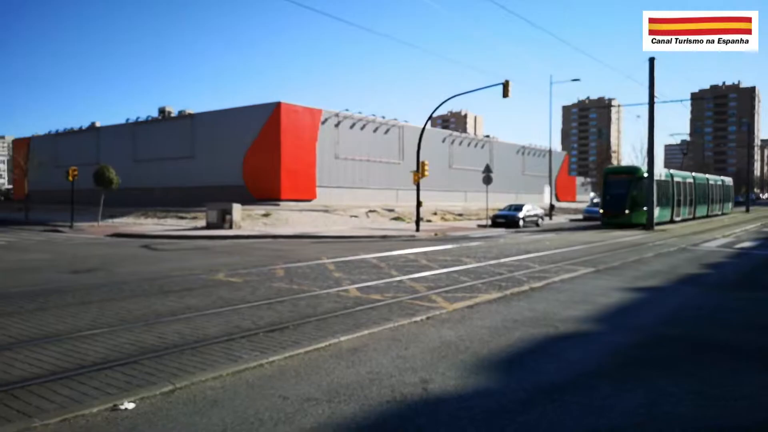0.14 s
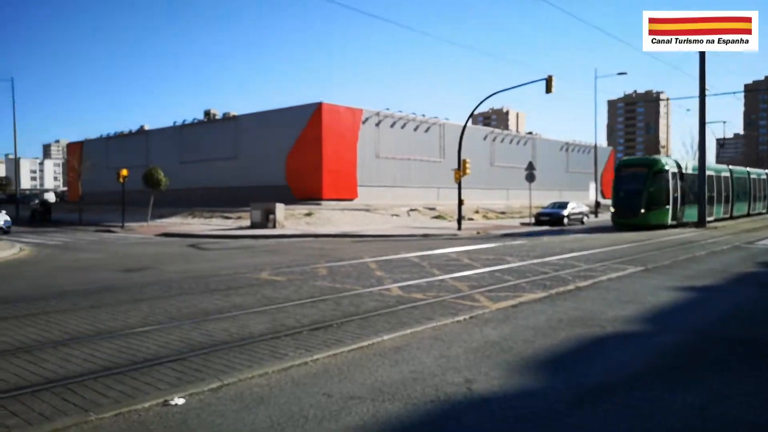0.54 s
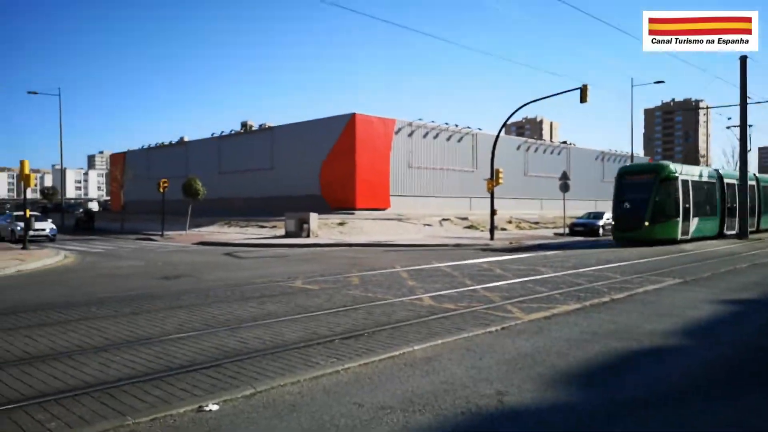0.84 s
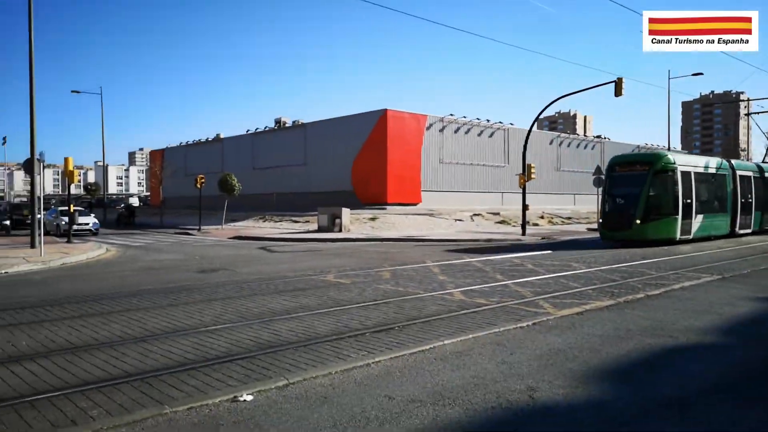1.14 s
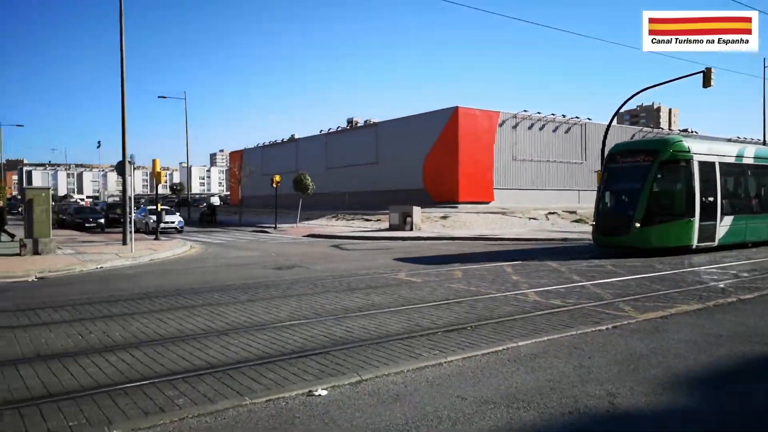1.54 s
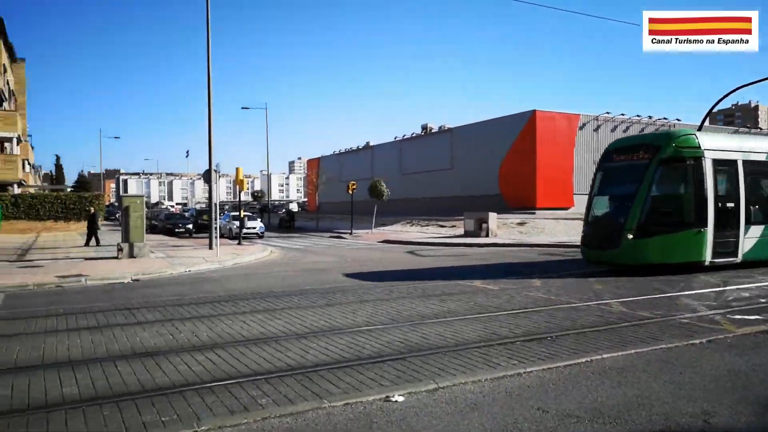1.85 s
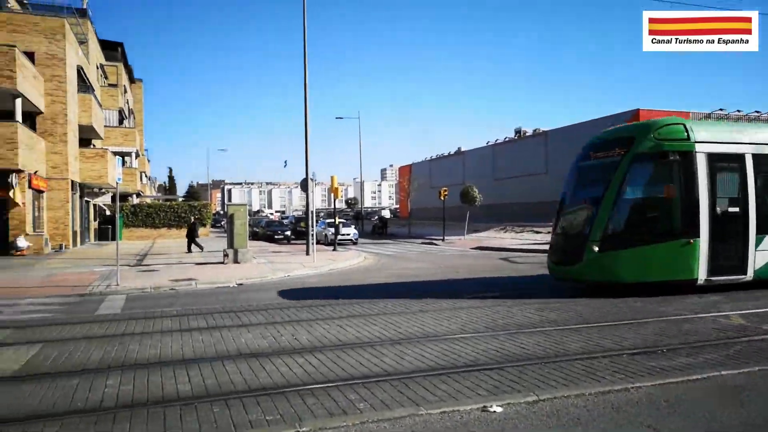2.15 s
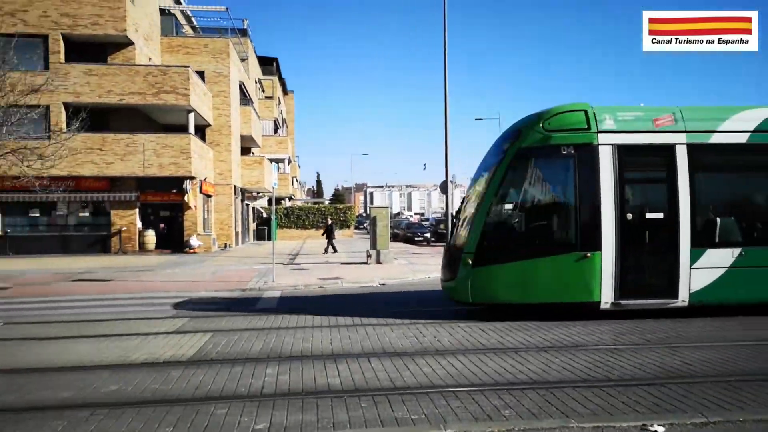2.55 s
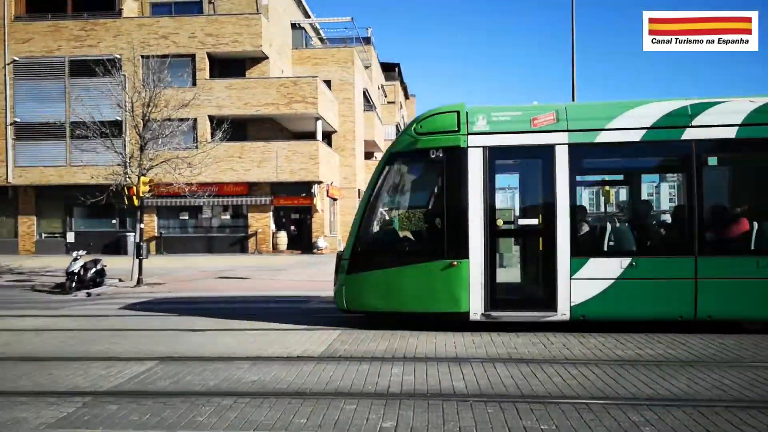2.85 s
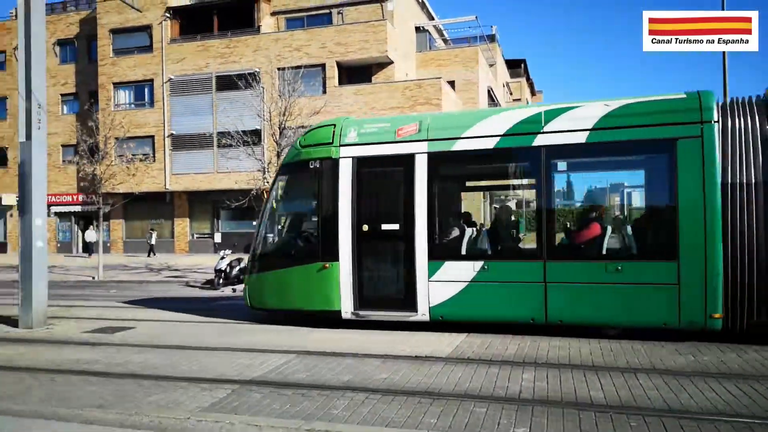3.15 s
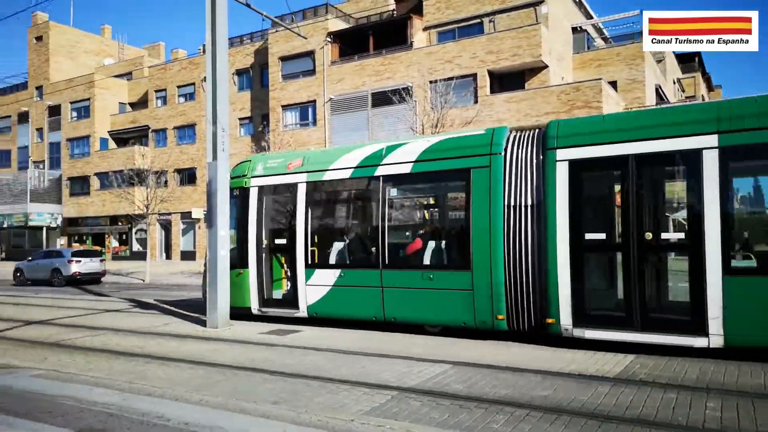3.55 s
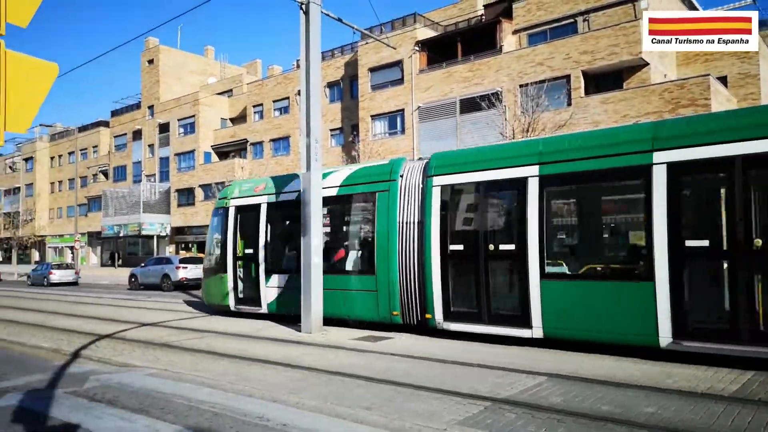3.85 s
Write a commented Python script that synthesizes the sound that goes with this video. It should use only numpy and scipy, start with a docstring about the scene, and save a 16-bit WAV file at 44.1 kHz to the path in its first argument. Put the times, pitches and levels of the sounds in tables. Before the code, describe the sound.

A tram approaches on street rails and rolls by close, wheels roaring and thudding.

```python
"""A tram nears on street tracks and rolls by close to the microphone. Noise shaped by moving colours
makes its wheels roar, the rails ring and the track bed drum as each bogie passes; decaying sines are the
thuds. The traction drive whines in drifting tones, a flange squeals thinly and narrow resonances sing.
One dry tick falls to the right. Behind, low noise is rumbling traffic and light wind bumping the microphone."""
import sys
import numpy as np
from scipy import signal
from scipy.fft import rfft, irfft, next_fast_len
from scipy.io import wavfile
from scipy.ndimage import uniform_filter1d, map_coordinates

SR = 44100
rng = np.random.default_rng(int(sys.argv[2]) if len(sys.argv) > 2 else 0)


def master(y):
    """Save y as 16-bit WAV."""
    cut = np.clip(np.atleast_2d(y).T, -1, 1)
    pcm = np.round(cut * 32767)  # scale
    wavfile.write(sys.argv[1], SR, pcm.astype(np.int16))


N = 176400
T = np.arange(N) / SR

# Strength of the wheel roar. Each row: time in seconds, level in dB before its trim.
ROAR_LEVEL = [(.03, -49.5), (.75, -48), (1.1, -44.5), (1.5, -42.5), (2.05, -40.5), (2.75, -36), (3.0, -34),
              (3.15, -36), (3.6, -36), (3.95, -36.5)]
# Ringing of the rails. Each row: time in seconds, level in dB before its trim.
RAIL_LEVEL = [(0, -47.5), (.4, -50), (1, -44.5), (1.8, -41.5), (2.15, -41.5), (2.5, -35.5), (2.75, -36),
              (3.2, -35), (3.37, -31), (3.63, -37), (4, -37.5)]
# Fine treble hiss of the wheels. Each row: time in seconds, level in dB before its trim.
HISS_LEVEL = [(0, -58.5), (.9, -56.5), (1.7, -54.5), (2.3, -51.5), (2.85, -48.5), (3.4, -47.5), (4, -48.5)]
ROAR_TRIM_DB, RAIL_TRIM_DB, HISS_TRIM_DB = 4.5, 4, 4
# Colour of the roar, coming and then abreast. Each row: frequency in Hz, relative density in dB per Hz.
ROAR_COMING = [(150, -16), (400, -2), (600, 0.5), (760, -2), (870, -8.5), (980, -5.5), (1080, -7),
               (1220, -3), (1520, -8.5), (1900, -4), (2150, -7.5), (3000, -13), (4500, -30)]
ROAR_ABREAST = [(150, -22.5), (400, -2), (470, -5.5), (570, 0.5), (730, -3.5), (950, 0), (1080, -8),
                (1270, -4), (1570, -15), (1830, -4.5), (2100, -12), (4500, -40)]
# Colour of the rails, coming and then abreast. Each row: frequency in Hz, relative density in dB per Hz.
RAIL_COMING = [(1500, -34.5), (1900, -3), (2150, -11), (2500, 2.5), (2760, -6), (2920, -5.5), (3200, -10),
               (3400, -11.5), (3700, -25), (5000, -46)]
RAIL_ABREAST = [(1700, -25.5), (2100, -15.5), (2350, -6.5), (2460, -4), (2650, -10), (2880, -9.5),
                (3100, -15), (3400, -22), (5000, -52)]
# Colour of the hiss. Each row: frequency in Hz, relative density in dB per Hz.
HISS_COLOUR = [(2000, -14), (3400, -4.5), (4000, 2.5), (4600, -2.5), (5100, -4), (5600, -2), (6300, -10.5),
               (7300, -5), (8400, -11), (9200, -19.5), (9900, -30), (12000, -33.5), (15000, -46.5)]
ABREAST_S, TURN_S = 3.23, 0.2  # when the first wheels have passed, and how quickly the colour turns

# Drumming of the track bed, loudest under each bogie. Each row: time in seconds, level in dB before its trim.
DRUM_LEVEL = [(0, -32), (.8, -32.5), (1.24, -34.5), (1.33, -29), (1.45, -29.5), (2, -31), (2.42, -26),
              (2.56, -26), (2.74, -28), (2.79, -20.5), (2.93, -17), (3.09, -18), (3.17, -25), (3.3, -27),
              (3.46, -22.5), (3.56, -25), (3.67, -22), (3.73, -20.5), (3.98, -17.5)]
# Track bed resonances. Each row: frequency in Hz, half width in Hz before narrowing, relative level in dB.
BED_MODES = [(201.5, 27, 1.5), (297.7, 89, -6.5), (362.5, 33, -12.5)]
# Colour of the bed from afar. Each row: frequency in Hz, relative density in dB per Hz.
BED_FAR_COLOUR = [(90, -23.5), (150, -18.5), (205, 0), (260, -0.5), (320, -9), (420, -22), (600, -50.5)]
BED_NEAR_TRIM_DB, BED_FAR_TRIM_DB = 1.5, -0.5
BED_TAKEOVER_DB = -24  # drum level above which the bed's own resonances outweigh the far drone

# Wheels thudding over uneven rail. Each row: start in seconds, level in dB, pitch of the bed's lowest
# resonance in Hz, boost of its upper resonances in dB.
THUDS = [(1.36, -18.5, 205.5, -11), (2.272, -20, 223.3, 3.5), (2.552, -27.5, 204, 15),
         (2.772, -16.5, 197, -4), (2.84, -12.5, 203.5, -1), (2.917, -5.5, 197.5, -5),
         (2.963, -11.5, 198.4, 9.5), (3.04, -6.5, 196.8, -4), (3.086, -16.5, 193.7, 13),
         (3.464, -13, 233.4, -8), (3.703, -13.5, 218, -0.5), (3.754, -8, 197, -6), (3.829, -15, 194, -1),
         (3.955, -9, 206, -3)]
THUD_ATTACK_S, THUD_T60_S = .008, 0.18

# Pitch of the three whining drives. Each row: time in seconds, frequency in Hz.
PITCH_A = [(.6, 1915), (.9, 1929), (1.2, 1943), (2.3, 1948), (3.35, 1952), (3.5, 1926), (3.7, 1908)]
PITCH_B = [(1.1, 2048), (1.55, 2046), (2.3, 2034), (2.7, 2010), (3, 1996)]
PITCH_C = [(1.7, 1805), (2.1, 1853), (3.2, 1838), (3.5, 1820), (3.9, 1847)]
# Swells of each whine. Each row: peak time in seconds, spread in seconds, level in dB.
SWELLS_A = [(.85, 0.22, -49), (1.08, 0.084, -39), (1.218, 0.037, -37.5), (1.448, 0.11, -51),
            (3.373, 0.037, -32), (3.51, 0.04, -31.5), (3.643, 0.022, -34)]
SWELLS_B = [(1.2, 0.1, -45), (1.41, .045, -46), (1.52, 0.044, -43.5), (2.15, 0.25, -50),
            (2.822, 0.015, -34), (2.955, 0.031, -31)]
SWELLS_C = [(2, 0.25, -55.5), (3.45, 0.22, -47.5)]
# Whines are clean from afar, rougher close by. Each row: time in seconds, noise share of the power from 0 to 1.
WHINE_ROUGH = [(1.1, .02), (1.25, .06), (2.9, .15), (3.4, .25)]
WHINE_WIDTH_HZ = 32  # half width of the noise around each whine
# Swells of the gear hum. Each row: peak time in seconds, spread in seconds, level in dB.
HUM_SWELLS = [(0.599, 1, -52.5), (1.9, 0.35, -44)]
HUM_HZ = 513

# Thin flange squeal, rising as the first wheels near. Each row: time in seconds, frequency in Hz.
SQUEAL_PITCH = [(2.35, 5500), (2.65, 5550), (2.83, 5680), (3, 5700)]
# Swells of the squeal. Each row: peak time in seconds, spread in seconds, level in dB.
SQUEAL_SWELLS = [(2.68, .14, -60.5), (2.82, .028, -51)]
# Single wheel and rail resonances that swell up. Each row: peak time in seconds, spread in seconds,
# frequency in Hz, half width in Hz, level in dB.
SINGING = [(.24, 0.092, 4880, 16, -59), (.15, 0.22, 5550, 260, -62), (.3, .25, 5136, 12, -64.5),
           (0.434, 0.092, 7330, 25, -67), (0.29, 0.45, 8600, 22, -71.5), (0.82, 0.035, 264.7, 11.5, -31),
           (1.05, 0.46, 2914, 95, -44.5), (.7, .4, 1183, 70, -53.5), (1.18, 0.1, 1200, 64, -43),
           (2.196, 0.45, 1296, 100, -46), (2.28, 0.021, 283, 30, -29), (2.55, 0.042, 300, 40, -24),
           (2.7, 0.12, 5590, 90, -58), (2.93, 0.07, 2960, 28, -47), (3, 0.084, 580, 130, -36),
           (3.38, 0.065, 2510, 80, -32.5), (3.6, 0.38, 7500, 67, -62.5)]

# What the tick rings with. Each row: frequency in Hz, level in dB above the tick's own, 60 dB decay in seconds.
TICK_MODES = [(1200, 6, .003), (3000, -3, .002), (6200, -1, .0009), (9500, -6, .0008)]
TICK_S, TICK_DB = .316, -21

# Colour of the traffic rumble. Each row: frequency in Hz, relative density in dB per Hz.
TRAFFIC_COLOUR = [(12, -9.5), (28, 0.5), (52, -1), (70, -2.5), (130, -6.5), (220, -7.5), (400, -23),
                  (1000, -38.5), (4000, -62)]
TRAFFIC_DB = -36
# Bumps of wind. Each row: peak time in seconds, spread in seconds, level in dB.
GUSTS = [(.96, 0.032, -30), (1.49, .014, -33), (2.1, 0.026, -35), (2.49, 0.057, -28.5), (2.735, 0.038, -21),
         (2.93, 0.085, -31), (3.89, 0.1, -25)]
# Colour of the wind. Each row: frequency in Hz, relative density in dB per Hz.
WIND_COLOUR = [(10, -15), (28, -4), (52, -4), (75, -13.5), (130, -17.5), (300, -57.5)]

# How alike the two microphone ports hear noise. Each row: frequency in Hz, likeness up to 1.
ALIKE = [(60, 0.99), (220, .995), (340, 0.92), (450, 0.17), (540, 0.6), (950, 0.8), (1300, 0.65),
         (1550, 0.6), (1950, .97), (3300, 0.55), (4000, 0.3), (9000, .2)]
# Level lean of the ports, in general and with the tram abreast. Each row: frequency in Hz, left over right in dB.
BALANCE = [(300, -0.5), (450, 1.5), (640, -5.5), (900, 1.5), (1250, -1), (1550, 8.5), (1850, -3.5),
           (2150, 5), (2550, -8), (3000, -11.5), (3500, 0), (4500, 1.5), (5700, 4), (7000, 8.5),
           (8200, 19.5), (9800, 0)]
BALANCE_ABREAST = [(300, 7.5), (450, 4), (660, -5), (1100, -0.5), (1550, 1), (1850, -4), (2200, -3),
                   (2500, 0.5), (2950, -2), (3500, -1)]
# Phase between the ports, likewise. Each row: frequency in Hz, lead of the left in radians.
LEAD = [(60, 0), (190, -0.58), (280, -0.2), (400, -0.34), (520, -1.5), (760, -0.64), (1080, -1.5),
        (1430, 0.2), (1650, -2), (1980, -1.2), (2550, -2.5), (2950, -2.5), (3400, 0.65), (4200, -2.5),
        (7000, -0.5)]
LEAD_ABREAST = [(400, 1.5), (540, -1.5), (760, -1.4), (1000, -1.7), (1300, -0.5), (1600, -1.5),
                (1950, -2.5), (2250, 1.3), (2500, 1.15), (2800, 0.8), (3200, 2.5), (3700, -3)]
TOP_HZ = 15100  # band limit of the microphone


def amp(db):
    """Decibels to gain."""
    return 10 ** (np.asarray(db) / 20)


def unit(x):
    """Scale to rms 1."""
    return x / np.sqrt(np.mean(x ** 2) + 1e-20)


def along(points, hz):
    """Read (Hz, value) points on a log frequency axis."""
    f, v = np.transpose(points)
    return np.interp(np.log(hz + 1), np.log(f + 1), v)


def curve(rows):
    """Draw (seconds, value) points as one value per sample."""
    return np.interp(T, *np.transpose(rows))


def swells(rows):
    """Gain of bell-shaped swells."""
    return sum(amp(db) * np.exp(-.5 * ((T - s) / spread) ** 2) for s, spread, db in rows)


def wobble(rate):
    """A smooth random curve with rate knots a second."""
    return map_coordinates(rng.standard_normal(2000), [T * rate], mode="wrap")


def filtered(x, response):
    """Pass x through a complex response of frequency."""
    m = next_fast_len(N + SR // 2)
    spectrum = rfft(x, m) * response(np.fft.rfftfreq(m, 1 / SR))
    return irfft(spectrum, m)[..., :N]


def shape(points):
    """Gain of a colour, falling steeply above its last point."""
    return lambda hz: amp(along(points, hz)) / (1 + (hz / points[-1][0]) ** 10)


def resonance(centre_hz, half_width_hz):
    """Gain of a single resonance, 1 at its centre and half at its half width."""
    return lambda hz: 1 / (1 + ((hz - centre_hz) / half_width_hz) ** 2)


def ports(hz, balance=BALANCE, lead=LEAD):
    """Level and phase at the left and right port, keeping the total power."""
    lean = amp(along(balance, hz))
    turn = np.exp(.5j * along(lead, hz))
    return np.array([lean * turn, 1 / turn]) * np.sqrt(2 / (1 + lean ** 2))


def rush(colour, balance=BALANCE, lead=LEAD):
    """Stereo noise of rms 1; the mix of mid and side sets how alike the ports are."""
    def mid_side(hz):
        angle = np.arccos(np.clip(along(ALIKE, hz), -1, .998)) / 2
        return colour(hz) * np.array([np.cos(angle), np.sin(angle)])

    mid, side = filtered(rng.standard_normal((2, N)), mid_side)
    left_right = np.array([mid + side, mid - side])
    return unit(filtered(left_right, lambda hz: ports(hz, balance, lead)))


def tone(hz, waver_hz, flutter_db):
    """An unsteady tone of rms 1, fluttering differently at each port."""
    phase = 2 * np.pi * np.cumsum(hz + waver_hz * wobble(45)) / SR
    shared = wobble(24.86)
    separate = np.array([wobble(14), wobble(16)])
    flutter = amp(flutter_db * (shared + separate))
    return unit(flutter * filtered(np.sin(phase), ports))


def wheels(rough_db=.5, ring_rough_db=0.3):
    """Steel rolling on steel gives a broad roar, ringing rails and a fine hiss."""
    roar_gain = amp(curve(ROAR_LEVEL) + ROAR_TRIM_DB + rough_db * wobble(17))
    rail_gain = amp(curve(RAIL_LEVEL) + RAIL_TRIM_DB + ring_rough_db * wobble(18))
    hiss_gain = amp(curve(HISS_LEVEL) + HISS_TRIM_DB + 0.27 * wobble(8.4))
    roar = roar_gain * patchy(passing(ROAR_COMING, ROAR_ABREAST), depth_db=1.5)
    rail = rail_gain * patchy(passing(RAIL_COMING, RAIL_ABREAST), depth_db=2.5)
    hiss = hiss_gain * patchy(rush(shape(HISS_COLOUR)), depth_db=3.0)
    return roar + rail + hiss


def passing(coming, abreast):
    """Noise whose colour and direction turn as the front goes by."""
    gone = .5 + .5 * np.tanh((T - ABREAST_S) / TURN_S)
    before = np.sqrt(1 - gone) * rush(shape(coming))
    after = np.sqrt(gone) * rush(shape(abreast), BALANCE_ABREAST, LEAD_ABREAST)
    return before + after


def patchy(x, depth_db):
    """Narrow bands of x swell and fade at random, as wheel and rail modes come and go."""
    z = signal.stft(x, nperseg=2048)[2]
    field = rng.standard_normal(z.shape[1:])
    field = uniform_filter1d(field, size=3, axis=0)  # smooth over frequency
    field = uniform_filter1d(field, size=9, axis=1)  # smooth over time
    return unit(signal.istft(z * amp(depth_db * unit(field)), nperseg=2048)[1][:, :N])


def track_bed():
    """The bed drones dully from afar; its resonances stand out when a bogie is near."""
    def body(f):
        return sum(amp(db) * resonance(hz, 0.94 * width)(f) for hz, width, db in BED_MODES)

    level = amp(curve(DRUM_LEVEL))
    near = level ** 2 / (level ** 2 + amp(BED_TAKEOVER_DB) ** 2)
    resonant = amp(BED_NEAR_TRIM_DB) * np.sqrt(near) * rush(body)
    drone = amp(BED_FAR_TRIM_DB) * np.sqrt(1 - near) * rush(shape(BED_FAR_COLOUR))
    return level * (resonant + drone)


def thuds():
    """Soft blows of the wheels ring the track bed, a little differently at each spot."""
    out = np.zeros(N)
    for s, db, low_hz, upper_db in THUDS:
        t = np.maximum(T - s, 0)
        ratio = low_hz / BED_MODES[0][0]  # all the resonances shift together
        ring = 0
        for k, (hz, _, level) in enumerate(BED_MODES):
            gain = (-1) ** k * amp(level + upper_db * (k > 0))
            ring = ring + gain * np.sin(2 * np.pi * hz * ratio * t)
        attack = 1 - np.exp(-(t / THUD_ATTACK_S) ** 2)
        out += ring * amp(db - 60 * t / THUD_T60_S) * attack
    return out


def drive():
    """The traction drive's three whines and a gear hum swell and fade as the cars move by."""
    motors = [(PITCH_A, SWELLS_A), (PITCH_B, SWELLS_B), (PITCH_C, SWELLS_C)]
    hum = swells(HUM_SWELLS) * tone(HUM_HZ, waver_hz=5, flutter_db=1.5)
    return hum + sum(swells(rows) * whine(curve(pitch)) for pitch, rows in motors)


def whine(hz):
    """A tone wrapped in narrow noise that follows its pitch."""
    rough = np.clip(curve(WHINE_ROUGH), 0, 1)
    skirt = filtered(rng.standard_normal(N), resonance(0, WHINE_WIDTH_HZ))
    carrier = np.cos(2 * np.pi * np.cumsum(hz) / SR)  # lifts the low noise to the whine's pitch
    fuzz = unit(filtered(skirt * carrier, ports))
    clean = tone(hz, waver_hz=4.2, flutter_db=.5)
    return np.sqrt(1 - rough) * clean + np.sqrt(rough) * fuzz


def squeal():
    """A wheel flange rubs the rail and sounds a thin, slightly rough tone."""
    return swells(SQUEAL_SWELLS) * whine(curve(SQUEAL_PITCH))


def singing():
    """Resonances of wheels and rails, as noise in single bands, come and go."""
    return sum(swells([(s, spread, db)]) * rush(resonance(hz, width))
               for s, spread, hz, width, db in SINGING)


def tick(left_db=-12):
    """One dry tick to the right: a few fast-decaying sines give it a little body."""
    t = np.maximum(T - TICK_S, 0)
    snap = sum(amp(TICK_DB + db - 60 * t / t60) * np.sin(2 * np.pi * hz * t)
               for hz, db, t60 in TICK_MODES)
    return snap * amp([[left_db], [0]])


def street():
    """Distant traffic is a low, gently wavering rumble; wind adds low bumps of noise."""
    traffic = amp(TRAFFIC_DB + 0.56 * wobble(4.8)) * rush(shape(TRAFFIC_COLOUR))
    wind = swells(GUSTS) * rush(shape(WIND_COLOUR))
    return traffic + wind


def scene():
    """The tram in the street."""
    return wheels() + track_bed() + thuds() + drive() + squeal() + singing() + tick() + street()


def record(dry):
    """The microphone's band limit cuts the top off steeply."""
    return filtered(dry, lambda hz: 1 / (1 + (hz / TOP_HZ) ** 60))


dry = scene()
out = record(dry)
master(out)
```